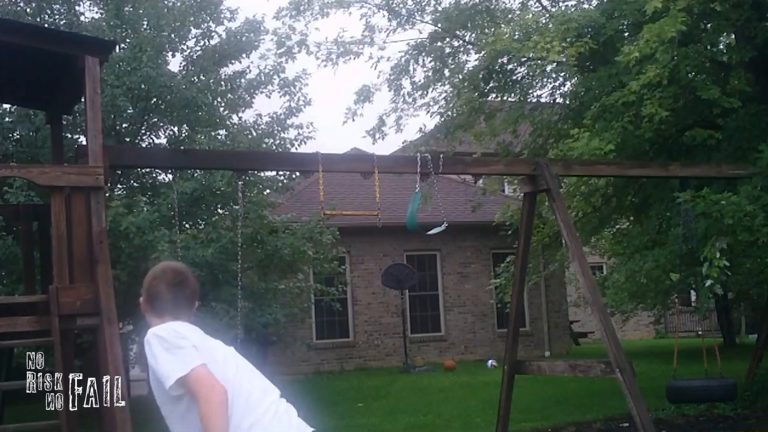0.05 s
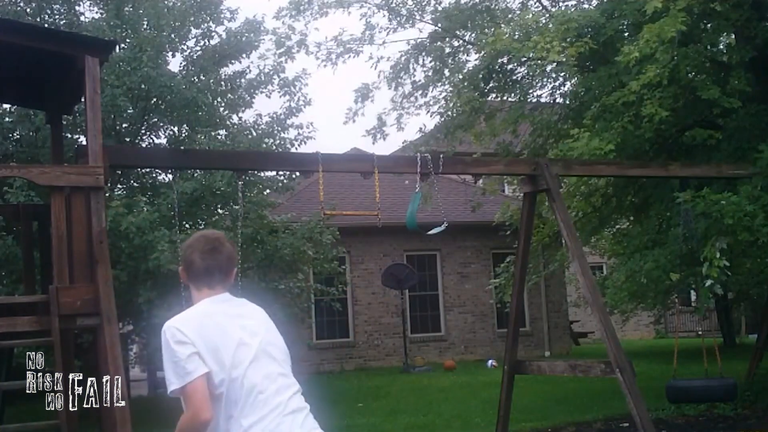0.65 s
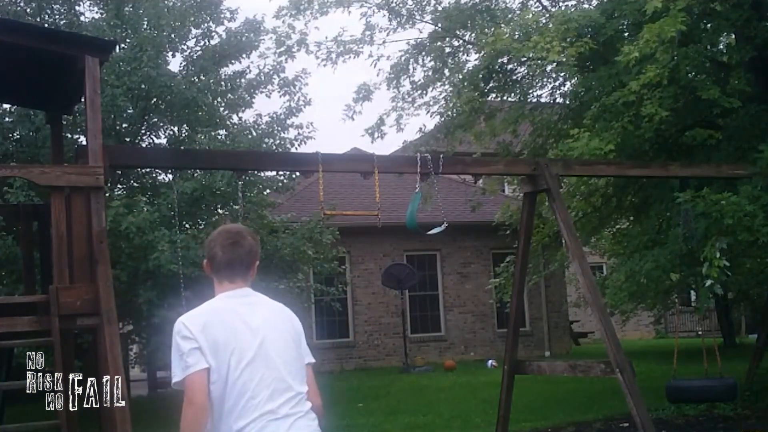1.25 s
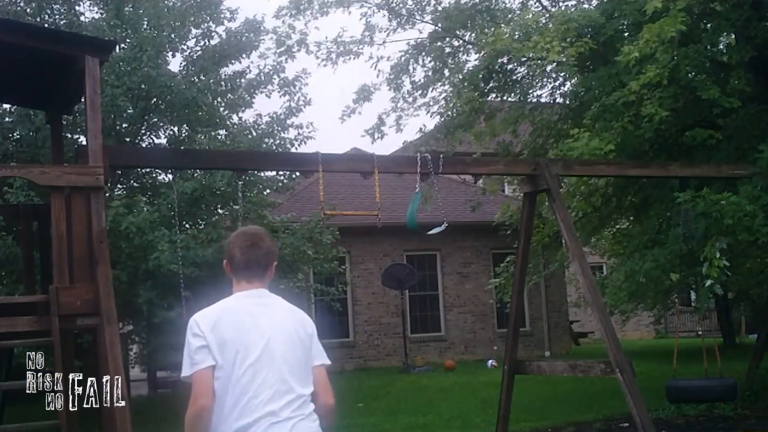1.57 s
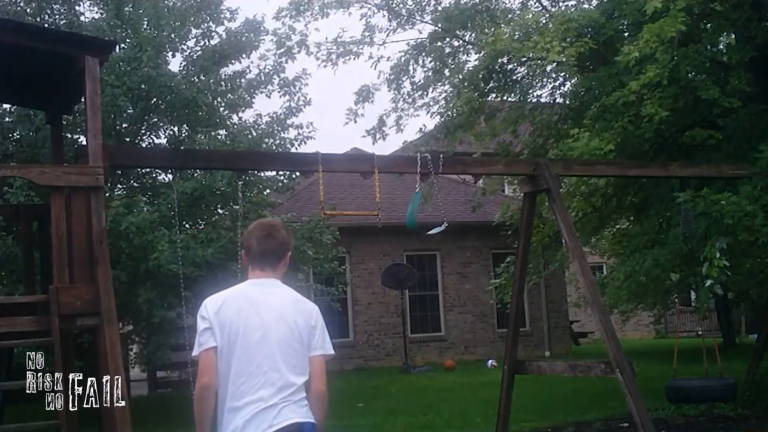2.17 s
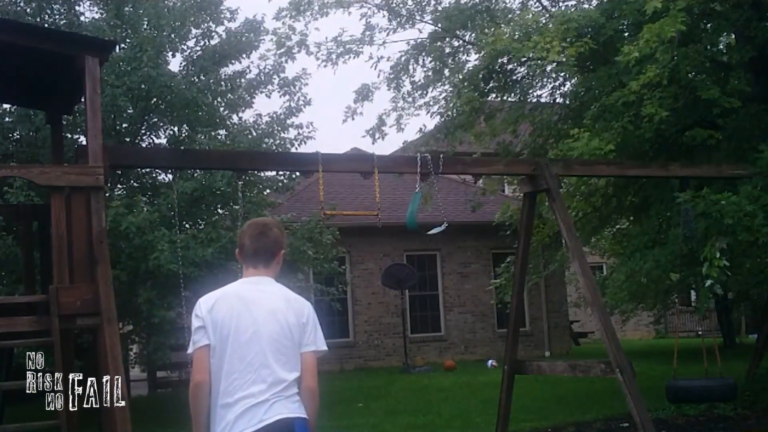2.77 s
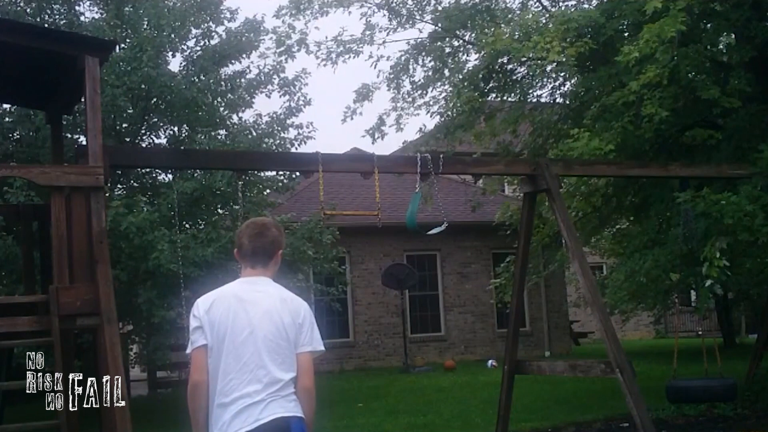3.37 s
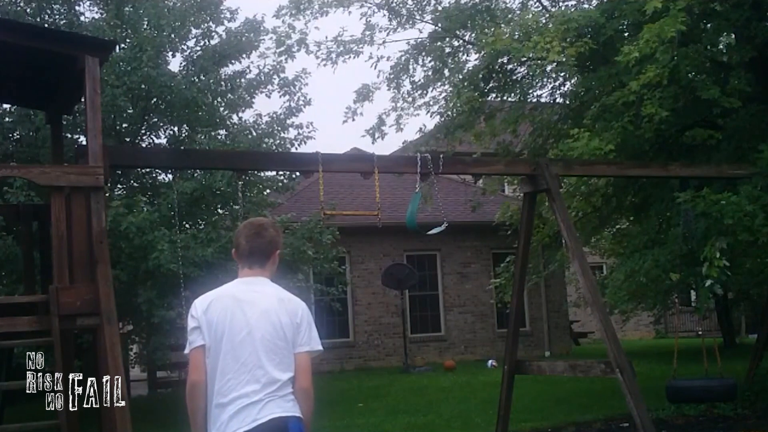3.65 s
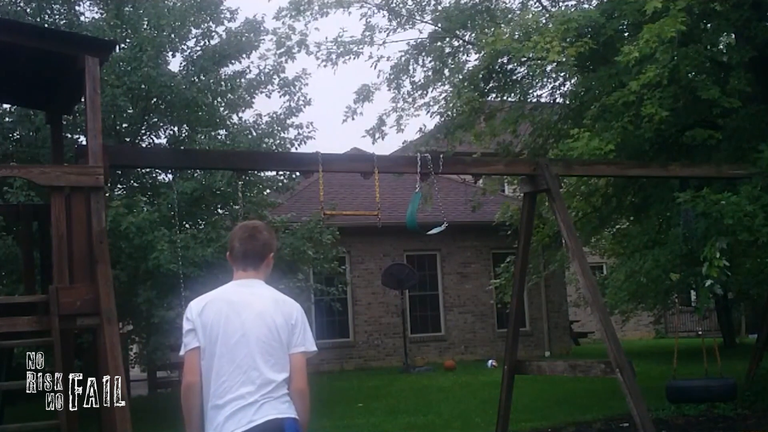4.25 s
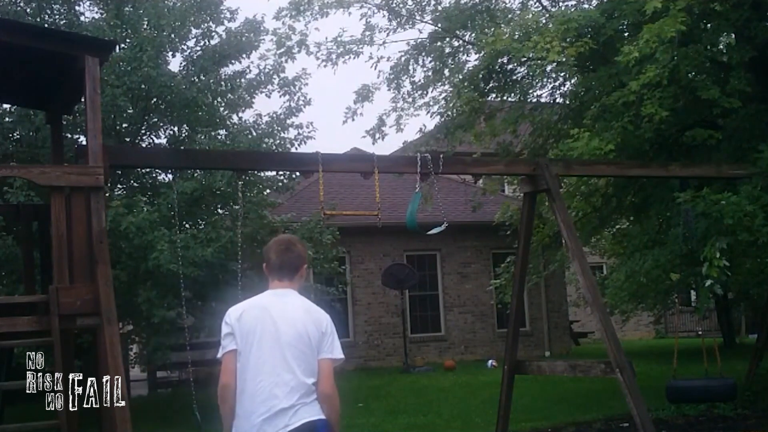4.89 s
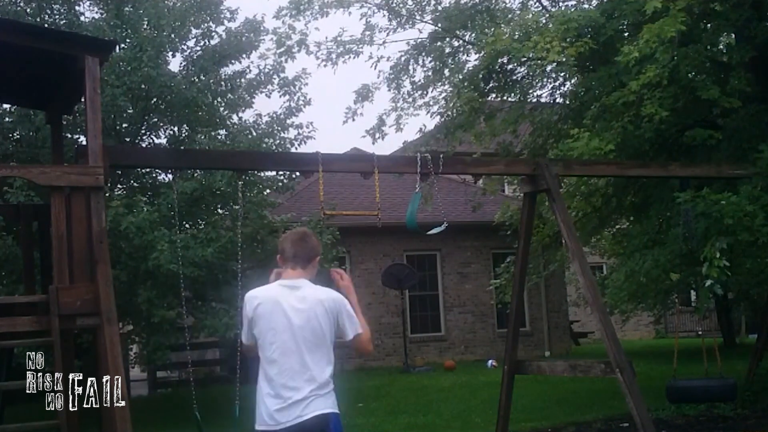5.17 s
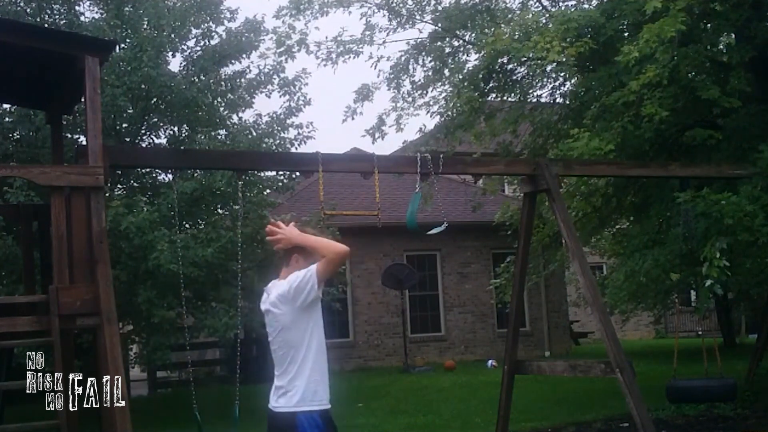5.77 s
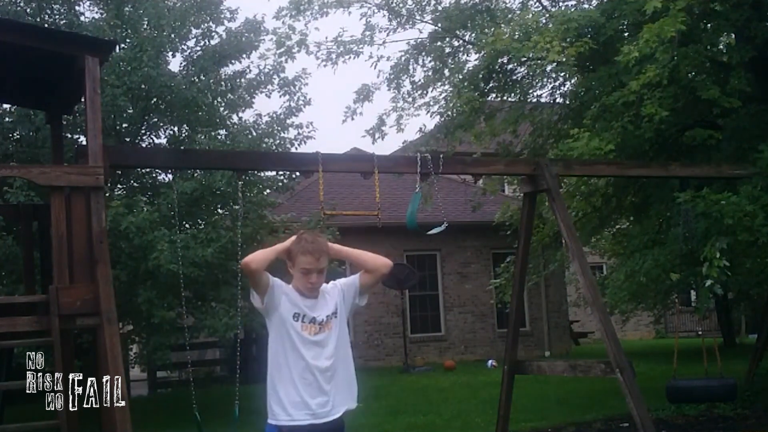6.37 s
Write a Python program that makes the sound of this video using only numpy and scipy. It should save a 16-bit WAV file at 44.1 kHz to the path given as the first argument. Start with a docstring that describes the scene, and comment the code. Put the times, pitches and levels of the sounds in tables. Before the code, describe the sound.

In a quiet back yard, a small bird whistles and leaves rustle briefly. A thrown ball then hits a window some way off with a thud and a sharp crack. Splinters shower down, heavier pieces knock on the wooden sill and ground, and a large shard drops a second later and rings. Afterwards birds keep chirping faintly as a distant engine hum fades. The microphone stands in the open air across the yard.

```python
"""Open air, a far engine's drone and small birds in the trees, heard from a back yard on two close mics.
Leaves rustle, then a thrown basketball smashes a window across the yard: the pane booms as it bends,
cracks and shakes its frame. Splinters shower down, heavy pieces knock on the sill and the ground, and a
large loose shard drops late and rings. The birds call on while the engine fades away."""
import sys
import numpy as np
from scipy import signal
from scipy.fft import rfft, irfft
from scipy.io import wavfile
from scipy.ndimage import uniform_filter1d

SR = 44100
rng = np.random.default_rng(int(sys.argv[2]) if len(sys.argv) > 2 else 0)


def file_out(sig):
    """Save sig as 16-bit WAV at sys.argv[1]."""
    # one column per channel
    cols = np.atleast_2d(sig).T
    # limit, then scale
    lim = np.clip(cols, -1, 1)
    pcm = np.round(lim * 32767).astype(np.int16)
    wavfile.write(sys.argv[1], SR, pcm)


N = 287973
TIME = np.arange(N) / SR
RING = TIME[:SR // 2]  # time axis of one struck sound


def amp(db):
    """Decibels to gain."""
    return 10 ** (np.asarray(db) / 20)


def unit(x):
    """Scales to rms 1."""
    return x / np.sqrt(np.mean(x ** 2) + 1e-20)


def read(points, hz):
    """Reads a table on a log-frequency axis."""
    f, value = np.transpose(points)
    return np.interp(np.log(hz + 1), np.log(f + 1), value)


def add(mix, s, sound):
    """Mixes a sound in at s seconds."""
    part = mix[max(round(s * SR), 0):][:len(sound)]
    part += sound[:len(part)]


def noise(spectrum, size=len(RING)):
    """Noise of rms 1 with the given spectrum."""
    gain = amp(read(spectrum, np.fft.rfftfreq(size, 1 / SR)))
    return unit(irfft(rfft(rng.standard_normal(size)) * gain, size))


def colour(x, spectrum, size=2048):
    """Causal filter: what passes rings only after its cause."""
    db = np.maximum(read(spectrum, abs(np.fft.fftfreq(size, 1 / SR))), -100)
    minimum_phase = np.exp(np.conj(signal.hilbert(np.log(amp(db)))))
    response = np.fft.ifft(minimum_phase).real
    return signal.oaconvolve(x, response[:size // 2])[:len(x)]


def decay(t60):
    """Envelope that falls 60 dB in t60 seconds."""
    return amp(-60 * RING / t60)


def ring(modes):
    """Damped sines of a struck object."""
    return sum(amp(db) * decay(t60) * np.sin(2 * np.pi * hz * RING) for hz, db, t60 in modes)


def impacts(per_s, spread_db):
    """Random collisions, mostly small and a few large."""
    size = amp(spread_db * np.minimum(rng.exponential(1, N), 3))
    return size * rng.choice([-1, 1], N) * (rng.random(N) < per_s / SR)


# The air all round the yard. Each row: frequency in Hz, relative level in dB.
AIR_SPECTRUM = [(82, -3), (140, -8.5), (200, -7.5), (229, -4.5), (263, -7.5), (296, -7.5), (447, -13),
                (677, -12), (2080, -20), (2480, -20.5), (3270, -22), (5250, -27), (7780, -27.5),
                (14300, -31), (15500, -36)]
# The rumble beneath it. Each row: frequency in Hz, relative level in dB.
RUMBLE_SPECTRUM = [(12, -4.5), (22, 0), (31, -1), (42, -4), (55, -17.5), (72, -0.5), (100, -10),
                   (130, -7.5), (180, -19.5), (400, -75)]
# Faint narrow bands in the hiss. Each row: centre in Hz, width in Hz, level in dB.
WHINES = [(5156, 700, -73.5), (7855, 130, -78.5), (11700, 50, -92)]

def outdoor_air(air_db=-58.5, rumble_db=-53.5):
    """The yard's steady bed of hiss, rumble and thin whines."""
    out = amp(air_db) * noise(AIR_SPECTRUM, N) + amp(rumble_db) * noise(RUMBLE_SPECTRUM, N)
    f = np.fft.rfftfreq(N, 1 / SR)
    for hz, width, db in WHINES:
        band = 1 / (1 + (2 * (f - hz) / width) ** 2)
        out += amp(db) * unit(irfft(rfft(rng.standard_normal(N)) * band, N))
    return out


# An engine far off, speeding up in three small steps. Each row: time in seconds, fourth order in Hz.
ENGINE_PITCH = [(1.05, 108.3), (1.15, 111.0), (2.51, 110.9), (2.57, 112.3), (3.57, 112.4), (3.81, 113.8)]
# Its hum at the mics, the fourth order. Each row: time in seconds, level in dB.
HUM_LEVEL = [(0, -44), (.85, -42), (1.47, -42.5), (1.55, -49.5), (1.87, -50.5), (2.12, -44), (2.36, -43),
             (2.44, -54), (2.68, -53), (2.75, -43.5), (3.45, -44), (4.05, -41), (4.33, -41), (4.48, -46.5),
             (4.86, -44.5), (5.1, -63), (6.5, -70)]
# Its throb at the mics, the second order. Each row: time in seconds, level in dB.
THROB_LEVEL = [(0, -48), (1.3, -44.5), (1.96, -47.5), (2.14, -64), (2.25, -49), (2.4, -56), (2.55, -48),
               (3.1, -49.5), (3.7, -44), (4.1, -47), (4.33, -56), (4.6, -50), (5.5, -64), (5.65, -51.5),
               (6.5, -53.5)]

def engine(waver_db=1.5, waver_s=.12):
    """Only the low orders of a far engine carry into the yard."""
    hz, hum_db, throb_db = (np.interp(TIME, *np.transpose(curve))
                            for curve in (ENGINE_PITCH, HUM_LEVEL, THROB_LEVEL))
    throb_db += waver_db * np.interp(TIME / waver_s, np.arange(SR), rng.standard_normal(SR))
    turns = np.cumsum(hz) / (4 * SR)
    orders = [(2, throb_db), (3, hum_db - 17), (4, hum_db), (6, hum_db - 25), (8, hum_db - 29)]
    return sum(np.sqrt(2) * amp(db) * np.sin(2 * np.pi * (order * turns + rng.random()))
               for order, db in orders)


def bird_note(hz, db, burr, taper):
    """One whistled note on a pitch curve, with soft ends; burr is the depth of its pitch flutter."""
    flutter = unit(uniform_filter1d(rng.standard_normal(len(RING)), size=120))[:len(hz)]
    turns = np.cumsum(hz * (1 + burr * flutter)) / SR
    return amp(db) * np.sqrt(2) * np.sin(2 * np.pi * turns) * signal.windows.tukey(len(hz), taper)


# A small bird behind the leaves. Each row: start in seconds, length in seconds, level in dB.
BIRD_CHIPS = [(0.159, 0.11, -59.5), (2.132, .115, -58.5), (3.509, .1, -60), (3.818, .06, -57),
              (3.919, .125, -66.5), (4.98, 0.12, -57)]

def bird_chips(top_hz=4350, end_hz=2860, fade_db=8.5):
    """Each chip scoops up, then slides down and fades, nearly breaks and ends rough."""
    out = np.zeros(N)
    for s, length, db in BIRD_CHIPS:
        t = TIME[:int(length * SR)]
        slide = 1 - np.exp(-(t / (.6 * length)) ** 2)
        scoop_hz = 1200 * np.exp(-t / .006)
        hz = top_hz + (end_hz - top_hz) * slide - scoop_hz
        break_db = 12 * np.exp(-((slide - .6) / .053) ** 2)
        level_db = db - fade_db * slide ** 2 - break_db
        add(out, s, bird_note(hz, level_db, burr=.009 * (1 + 6 * slide ** 2), taper=.3))
    return out


def bird_whistle(start_s=.217, length_s=.2, held_hz=3477, db=-50.5, sag_db=7):
    """A pure held note that starts sharp, settles in pitch and sags in level."""
    out, t = np.zeros(N), TIME[:int(length_s * SR)]
    hz = held_hz + 128 * np.exp(-t / .0193)
    add(out, start_s, bird_note(hz, db - sag_db * (t / length_s) ** 2, burr=.002, taper=.24))
    return out


# A soft rustle in the yard before the ball lands. Each row: time in seconds, level in dB.
RUSTLE_LEVEL = [(.385, -81), (.398, -54.5), (.425, -68), (.455, -55), (.475, -61), (.505, -56.5),
                (.55, -71)]
# The tone of the leaves. Each row: frequency in Hz, relative level in dB.
LEAF_SPECTRUM = [(300, -10), (900, 9.5), (1600, -2), (3000, -1.5), (6500, -8), (8300, -4), (10300, -6),
                 (11500, -14), (15000, -30)]

def rustle():
    """Leaves brush one another in fine crackles."""
    s, db = np.transpose(RUSTLE_LEVEL)
    crackle = unit(colour(impacts(per_s=4600, spread_db=2.5), LEAF_SPECTRUM))
    return crackle * amp(np.interp(TIME, s, db)) * (TIME > s[0]) * (TIME < s[-1])


# Faint puffs of hiss at the mics. Each entry: start in seconds.
PUFF_STARTS = [.393, .975, 3.383, 3.49, 3.875, 3.986, 4.478, 4.88, 4.988, 5.497, 5.777, 5.987]
# Their tone. Each row: frequency in Hz, relative level in dB.
PUFF_SPECTRUM = [(300, 9.5), (1000, 2), (2000, 1.5), (5000, -1.5), (10000, -6), (15000, -12)]

def puffs(length_s=.0246, db=-58):
    """Brief puffs of hiss, alike in length and level."""
    out, size = np.zeros(N), int(length_s * SR)
    for s in PUFF_STARTS:
        add(out, s, amp(db) * noise(PUFF_SPECTRUM)[:size] * signal.windows.tukey(size, .3))
    return out


SMASH_S = 1.1003
# Bending modes of the pane across the yard. Each row: frequency in Hz, relative level in dB,
# time to fall 60 dB (t60) in seconds.
PANE_MODES = [(60, -23.5, 0.28), (136, -19.5, 0.064), (211, -9.5, 0.026), (250, -11, 0.052),
              (337, -17.5, 0.1), (533, -15, 0.014), (590, -12, 0.04), (790, -30, 0.17), (830, -13, 0.027),
              (1000, -20.5, 0.053), (1062, -31, 0.063), (2250, -30, 0.031), (2540, -29.5, 0.052),
              (5050, -37, 0.051)]
# Glass breaking. Each row: frequency in Hz, relative level in dB.
CRACK_SPECTRUM = [(760, -33), (1300, -10), (1680, -4.5), (2470, -2), (2690, -0.5), (4240, -10),
                  (5160, -2.5), (6620, -18), (8150, -6.5), (9230, -18), (10000, -13), (10900, -24),
                  (15500, -27)]
# The wooden frame and sill. Each row: frequency in Hz, relative level in dB.
FRAME_SPECTRUM = [(100, -6.5), (170, -19), (193, 12.5), (248, 2.5), (297, 10.5), (333, 6.5), (538, 3.5),
                  (654, 6.5), (952, 7), (1030, 11.5), (1520, -11), (2170, -9), (2600, -6.5), (3380, -27),
                  (5720, -120)]

def smash(pane_gain_db=1, crack_db=-31, rattle_db=-29, contact_s=.002, lag_s=.0025):
    """The soft ball bends the pane; a moment later it cracks and shakes its frame."""
    out = np.zeros(N)
    add(out, SMASH_S, -amp(pane_gain_db) * ring(PANE_MODES) * np.minimum(RING / contact_s, 1))
    add(out, SMASH_S + lag_s, amp(crack_db) * noise(CRACK_SPECTRUM) * decay(t60=.22))
    add(out, SMASH_S + lag_s, amp(rattle_db) * noise(FRAME_SPECTRUM) * decay(t60=.18))
    return out


# Glass spilling from the window. Each row: start in seconds, relative splinter level in dB,
# relative clatter level in dB, hold in seconds, fade in dB per second.
GLASS_SPILLS = [(1.099, -44.5, -41.5, 0.29, 36.5), (1.621, -49.5, -46.5, 0.036, 84),
                (1.813, -57, -55, .06, 36), (2.185, -43.5, -62, 0.032, 300),
                (2.196, -53.5, -49.5, 0.19, 45), (2.845, -70, -58, 0.028, 130)]

def spill_level(dull=False, rise_s=.0082):
    """How much glass is falling at each moment, as the gain of its splinters or of its dull clatter."""
    power = np.zeros(N)
    for s, fine_db, dull_db, hold, fade in GLASS_SPILLS:
        age = TIME - s
        db = (dull_db if dull else fine_db) - fade * np.maximum(age - hold, 0)
        power += (np.clip(age / rise_s, 0, 1) * amp(db)) ** 2
    return np.sqrt(power)


# Small pieces colliding below the window. Each row: frequency in Hz, relative level in dB.
SPLINTER_SPECTRUM = [(880, -27), (1500, 0), (2170, -5.5), (2800, -2), (3030, -2), (3410, -0.5), (3720, -6),
                     (5140, -1), (6820, -12.5), (7900, -1.5), (9140, -11), (10200, -6), (10900, -15.5),
                     (12100, -12.5), (15500, -19.5)]

def shower(splinter_gain_db=-1.4, clatter_gain_db=.04, grit_share=1.15, count=200):
    """Many splinters, each with its own pitch, collide and rattle on the sill."""
    hits = impacts(per_s=2200, spread_db=2.5)
    piece = rng.integers(0, count, N)
    pitches = np.linspace(1800, 14500, count) * rng.uniform(1.0, 1.02, count)
    tones = [ring([(hz, 0, .06 * np.sqrt(5000 / hz))])[:SR // 8] for hz in pitches]  # high ones die first
    tinkle = np.zeros(N)
    for at in np.flatnonzero(hits):
        add(tinkle, at / SR, hits[at] * tones[piece[at]])
    grit = impacts(per_s=6000, spread_db=2)  # crumbs too small to ring
    fine = unit(colour(unit(tinkle) + grit_share * unit(grit), SPLINTER_SPECTRUM))
    clatter = unit(colour(impacts(per_s=960, spread_db=1.5), FRAME_SPECTRUM))
    return (amp(splinter_gain_db) * fine * spill_level()
            + amp(clatter_gain_db) * clatter * spill_level(dull=True))


# Heavy pieces on the sill and ground. Each row: start in seconds, level in dB, t60 in seconds.
HEAVY_LANDINGS = [(1.136, -31.5, 0.065), (1.376, -32, .055), (1.639, -38, 0.031), (1.6585, -29.5, .06),
                  (1.673, -37.5, 0.044), (1.902, -46, 0.027), (2.175, -35, 0.077), (2.192, -33.5, .09),
                  (2.214, -31, 0.043), (2.261, -41, 0.11), (2.302, -32, 0.053), (2.445, -40, 0.087),
                  (2.522, -43.5, 0.12), (2.685, -35.5, 0.048), (2.693, -38, 0.026)]

def knocks(heavy_db=-35, heavy_low_hz=200, db_per_octave=3.5):
    """Heavy pieces strike wood in short dull bursts; lighter ones cannot move its low modes."""
    out = np.zeros(N)
    for s, db, t60 in HEAVY_LANDINGS:
        low_hz = min(heavy_low_hz * 2 ** ((heavy_db - db) / db_per_octave), 780)
        low_cut = signal.butter(3, low_hz, "high", fs=SR, output="sos")
        body = unit(signal.sosfilt(low_cut, noise(FRAME_SPECTRUM)))
        add(out, s, amp(db) * body * decay(t60))
    return out


def stray_shards(per_s=16, low_hz=2600, high_hz=10500, t60=.13, bright_db=-2, count=64):
    """Rows like SHARD_LANDINGS for fainter shards that land at random, following the spills' level."""
    level_db = 20 * np.log10(spill_level() + 1e-9) - 5.5
    jitter, height = rng.random((count, 2)).T
    times = SMASH_S + (np.arange(count) + jitter) / per_s
    pitches = low_hz * (high_hz / low_hz) ** height
    return [(s, hz, np.interp(s, TIME, level_db), t60, bright_db)
            for s, hz in zip(times, pitches) if s < GLASS_SPILLS[-1][0]]


# The shards that carry clearest across the yard. The rows near 3 kHz and 5 kHz from 2.2 s on are the large #
# shard itself, ringing out clearly as it lands. Each row: start in seconds, main mode in Hz, # level in dB, t60
# in seconds, gain of the other modes and the scrape in dB.
SHARD_LANDINGS = [(1.252, 7622, -46, 0.16, -12), (1.377, 2067, -40.5, 0.044, 0),
                  (1.473, 3488, -45, .089, -5), (1.532, 3359, -47.5, 0.11, -16),
                  (1.638, 4220, -41, 0.094, -3), (1.704, 6115, -48.5, .063, 6),
                  (1.777, 4177, -49.5, 0.14, -18), (1.853, 7838, -36.5, 0.063, -7),
                  (1.993, 7278, -48.5, .039, 2), (2.214, 4952, -27, 0.086, -14),
                  (2.356, 2971, -49, .2, -16), (2.392, 2930, -47, 0.22, -20),
                  (2.478, 3890, -52.5, 0.28, -8), (2.612, 4952, -47.5, .13, -7),
                  (2.694, 10034, -49, 0.16, -2.5), (2.861, 4995, -49.5, .052, -0.5),
                  (2.881, 9905, -51.5, .074, 2)]

def clinks(mode_db=-13, scrape_db=-4, rise_s=.0015):
    """Each shard scrapes down on an edge and rings with one strong mode and eight shorter ones."""
    out = np.zeros(N)
    for s, hz, db, t60, bright_db in SHARD_LANDINGS + stray_shards():
        others = ring([(f, mode_db, t60 / 2) for f in rng.uniform(3600, 11000, 8)])
        scrape = amp(scrape_db) * noise(SPLINTER_SPECTRUM) * decay(t60=.094)
        sound = ring([(hz, 0, t60)]) + amp(bright_db) * (others + scrape)
        add(out, s, amp(db) * sound * np.minimum(RING / rise_s, 1))
    return out


# Free modes of the large shard. Each row: frequency in Hz, relative level in dB, t60 in seconds.
LARGE_SHARD_MODES = [(2340, -15.5, 0.2), (2945, -10.5, 0.19), (3056, -19, 0.3), (3750, -26, 0.2),
                     (4840, -8, 0.16), (5225, -18, 0.13), (6660, -18, .1), (7240, -8, 0.12),
                     (7500, -13, .1), (8420, -26, 0.12), (8870, -19, 0.32), (9970, -14, 0.23),
                     (10600, -18.5, 0.21), (12600, -15, .07)]
# Its blows below the window. Each row: start in seconds, gain in dB.
TUMBLE_BLOWS = [(2.182, -45), (2.199, -35), (2.207, -34.5), (2.2124, -35.5), (2.301, -45), (2.324, -43),
                (2.356, -43.5), (2.384, -46.5), (2.462, -53.5), (2.481, -45), (2.539, -49)]

def large_shard(detune=.012, uneven_db=3, scrape_db=-6, rise_s=.001):
    """A big piece tumbles; each blow lands on another edge, which shifts and weights its modes."""
    out, top_hz = np.zeros(N), LARGE_SHARD_MODES[-1][0]
    for s, db in TUMBLE_BLOWS:
        chance = np.clip(rng.standard_normal((len(LARGE_SHARD_MODES), 2)), -1.5, 1.5)
        # the high modes are the most sensitive to how the piece is supported
        modes = [(hz * (1 + detune * shift * hz / top_hz), level + uneven_db * weight, t60)
                 for (hz, level, t60), (shift, weight) in zip(LARGE_SHARD_MODES, chance)]
        scrape = amp(scrape_db) * noise(SPLINTER_SPECTRUM) * decay(t60=.045)
        add(out, s, amp(db) * (ring(modes) + scrape) * np.minimum(RING / rise_s, 1))
    return out


def tick(start_s=2.558, db=-32):
    """One dry tick close to the mics."""
    out = np.zeros(N)
    add(out, start_s, amp(db) * noise([(1000, -20), (4500, 0), (15000, -5)]) * decay(t60=.005))
    return out


def bird_run(start_s=4.175, step_s=.1245, note_s=.055, low_hz=2680, high_hz=3385, db=-56.5, count=6):
    """A bird sings evenly spaced upward sweeps and tires on the last ones."""
    out = np.zeros(N)
    hz = low_hz + (high_hz - low_hz) * np.linspace(0, 1, int(note_s * SR)) ** 1.31
    for k in range(count):
        tire_db = 9 * (k / (count - 1)) ** 5
        add(out, start_s + k * step_s, bird_note(hz, db - tire_db, burr=.009, taper=.6))
    return out


def foliage(x, t60, delay_s=0):
    """Foliage smears a sound into a diffuse tail."""
    tail = rng.standard_normal(SR) * amp(-60 * TIME[:SR] / t60) * (TIME[:SR] >= delay_s)
    return signal.fftconvolve(x, tail / np.linalg.norm(tail))[:N]


def birds_in_trees(leaves_db=-7, far_trees_db=-17):
    """Leaves smear the chips and sweeps, the whistle comes through clear; far trees return them all."""
    hidden = bird_chips() + bird_run()
    song = hidden + amp(leaves_db) * foliage(hidden, t60=.13) + bird_whistle()
    return song + amp(far_trees_db) * foliage(song, t60=1.3, delay_s=.12)


# The yard's echo at the mics. Each row: frequency in Hz, t60 in seconds.
YARD_DECAY = [(100, .4), (1000, .6), (4000, .48), (10000, .26)]

def yard(x, gap_s=.0084, echoes_per_s=2000):
    """Walls and trees scatter the sound back; the treble dies first."""
    taps = rng.choice([-1., 1.], SR) * (rng.random(SR) < echoes_per_s / SR) * (TIME[:SR] > gap_s)
    hz, t, bands = signal.stft(taps, SR, nperseg=256)
    fade = amp(-60 * t / read(YARD_DECAY, hz)[:, None])
    tail = signal.istft(bands * fade, SR, nperseg=256)[1]
    return signal.fftconvolve(x, tail / np.linalg.norm(tail))[:N]


# The noise that the two mics do not share. Each row: frequency in Hz, relative level in dB.
SIDE_SPECTRUM = [(12, 29), (35, 39.5), (85, 16), (150, -13), (600, 2.5), (1200, -15.5), (2200, -7),
                 (4000, -3), (9000, -0.5), (13800, -2.5), (15500, -21)]

def scene(smash_wet_db=-16, glass_wet_db=-11, bird_wet_db=-13, side_noise_db=-64, side_echo_db=-41):
    """Everything reaches two closely spaced mics alike; only faint noise and a little echo differ."""
    crash = smash()
    glass = knocks() + clinks() + large_shard()
    song = birds_in_trees()
    echo = yard(amp(smash_wet_db) * crash + amp(glass_wet_db) * glass + amp(bird_wet_db) * song)
    mid = crash + glass + shower() + song + echo + rustle() + engine() + outdoor_air() + puffs() + tick()
    side = amp(side_noise_db) * noise(SIDE_SPECTRUM, N) + amp(side_echo_db) * yard(mid)
    return np.array([mid + side, mid - side])


def record(dry, ceiling=.45, edge_hz=15300):
    """The mic input rounds off the loudest peaks; then a steep band limit."""
    rounded = ceiling * np.tanh(dry / ceiling)
    low_pass = signal.firwin(511, edge_hz, window=("kaiser", 9), fs=SR)
    return signal.oaconvolve(rounded, low_pass[None], "same")


dry = scene()
out = record(dry)
file_out(out)
```